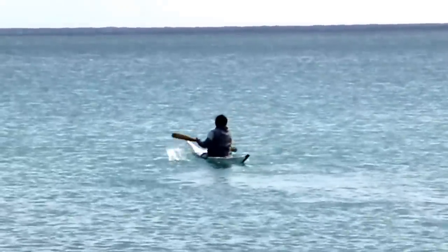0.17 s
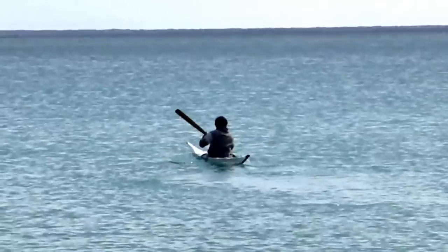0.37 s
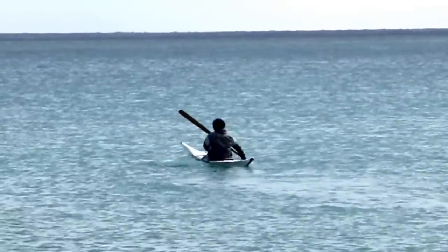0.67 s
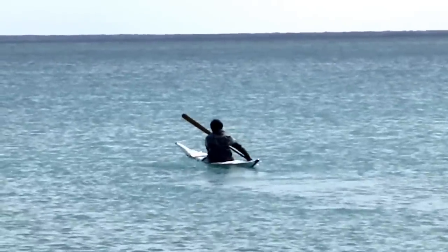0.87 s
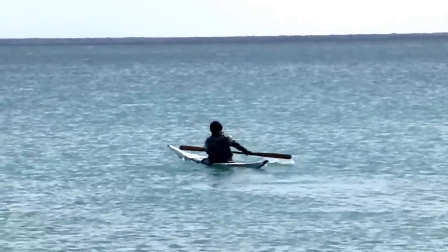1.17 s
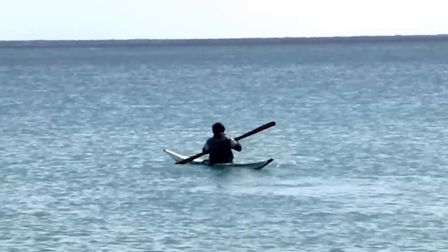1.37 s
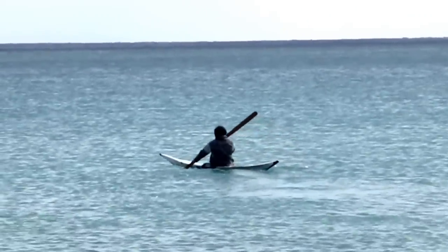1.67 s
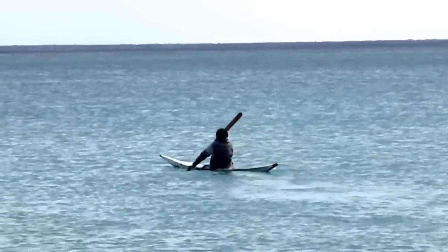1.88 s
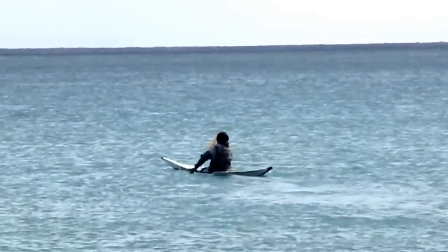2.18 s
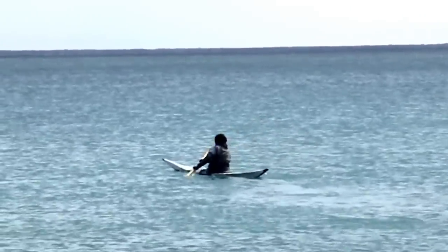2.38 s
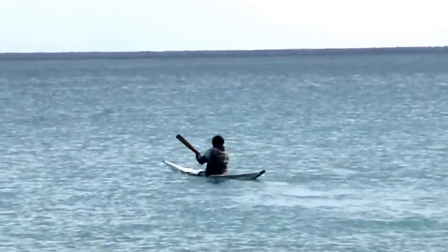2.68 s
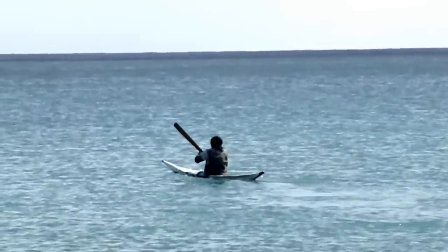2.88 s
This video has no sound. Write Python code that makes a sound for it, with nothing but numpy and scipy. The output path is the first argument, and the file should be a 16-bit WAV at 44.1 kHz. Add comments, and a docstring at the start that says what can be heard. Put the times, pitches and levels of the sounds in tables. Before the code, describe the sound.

A small wave washes ashore, close to a slightly nasal microphone. Quiet sea hiss and faint wind rumble open, with soft hollow knocks near 0.2 s and tiny drips and glugs to 0.6. At about 0.65 plops burst into a bubbly, fluttering splash, swelling around 1.0 and again at 1.65 with fizzing foam, knocks and crisp droplets. Last drips fall near 2.1; the hiss drains away by 3.

```python
"""A small wave on a shore

A wave washes in, swells and drains away: four ranges of hiss, each mixed with a cloud of ringing bubbles.
Knocks, plops and droplets stand out as damped rings with a splat of noise; glugs are gliding sines.
Shaped noise behind them is the distant sea, a faint wind rumble and microphone hiss.
The microphone's housing gives the wave, knocks, plops and droplets a nasal colour."""
import sys
import numpy as np
from scipy.fft import rfft, irfft, next_fast_len
from scipy.io import wavfile
from scipy.ndimage import map_coordinates

SR = 44100
rng = np.random.default_rng(int(sys.argv[2]) if len(sys.argv) > 2 else 0)


def unload_wav(signal):
    """Save mono or channel-first audio to the path in sys.argv[1] as 16-bit WAV at rate SR, clipped to [-1, 1]."""
    wavfile.write(
        sys.argv[1],
        SR,
        np.round(np.clip(np.atleast_2d(signal).T, -1, 1) * 32767).astype(np.int16),
    )


N = 132300  # samples, 3 s


def wave():
    """Four ranges of one wash; a fast surge moves the upper three together, deepest in full flow."""
    low = gurgle()
    upper = splash() + fizz() + foam()
    full_db, calm_db = 0.74, 0.6  # surge depth at the height of the flow and towards silence
    flow_db = curve(SPLASH_LEVEL)
    depth_db = calm_db + (full_db - calm_db) * amp(flow_db - flow_db.max())
    return low + amp(depth_db * wobble(110)) * upper


# middle range of the wash, rms before the surge: start_s, level_db
SPLASH_LEVEL = [(0, -47), (.14, -54.5), (.42, -41.5), (.57, -35), (.66, -26.5), (.8, -28.5), (1.06, -24.5),
                (1.42, -28.5), (1.66, -24), (1.9, -29.5), (2.15, -35), (2.63, -40), (3, -45.5)]
# tone of the middle range: freq_hz, gain_db (relative)
SPLASH_BAND = [(500, -29), (900, -11.5), (1250, -0.5), (2000, -2), (2900, -1), (4000, -5), (7000, -63)]


def splash():
    """Smaller bubbles ring higher and splash through the middle range."""
    grains = bubbles(1117, 3380, cycles=20.7, spread_db=1.5, count=3000, size=1200)
    return water(SPLASH_LEVEL, SPLASH_BAND, grains, hiss_db=8.0, flutter_db=-0.27, rate=28)


# splashing treble, rms before the surge: start_s, level_db
FIZZ_LEVEL = [(0, -59), (.3, -43), (.41, -47), (.52, -37), (.578, -38.5), (.588, -31), (.8, -32.5),
              (.95, -29), (1.3, -32.5), (1.68, -29), (1.87, -33.5), (2.2, -40.5), (3, -45.5)]
# tone of the treble: freq_hz, gain_db (relative)
FIZZ_TONE = [(1500, -44), (2600, 1), (3600, -3), (4400, -2), (5700, 5.5), (8000, -0.5), (10200, 1),
             (12000, -5), (16000, -57)]


def fizz():
    """Spray fizzes: tiny bubbles ring briefly over a wide treble range."""
    grains = bubbles(2880, 11650, cycles=24, spread_db=3.0, count=3500, size=600)
    return water(FIZZ_LEVEL, FIZZ_TONE, grains, hiss_db=6.0, flutter_db=0.2, rate=80)


# low range of the wash, rms before the trim in gurgle(): start_s, level_db
GURGLE_LEVEL = [(0, -60), (.44, -51), (.59, -50.5), (.66, -36.5), (1.15, -32.5), (1.42, -37.5),
                (1.58, -30.5), (2.05, -41.5), (2.6, -42.5), (3, -46.5)]
# tone of the low range: freq_hz, gain_db (relative)
GURGLE_TONE = [(150, -31), (330, -7.5), (550, -1), (850, 3), (1200, -8.5), (2000, -44.5)]


def gurgle():
    """Big bubbles ring low and gurgle."""
    grains = bubbles(376, 1000, cycles=15.0, spread_db=0.7, count=1500, size=2000)
    trim = amp(-1.7)
    return trim * water(GURGLE_LEVEL, GURGLE_TONE, grains, hiss_db=8.5, flutter_db=0.1, rate=14)


# foam sparkling behind each crest, rms before the surge: start_s, level_db
FOAM_LEVEL = [(.7, -57), (.86, -43), (.97, -30.5), (1.16, -29), (1.28, -35), (1.5, -32), (1.79, -31),
              (1.92, -35), (3, -56)]
# tone of the foam: freq_hz, gain_db (relative)
FOAM_TONE = [(2800, -24.5), (3900, 1.5), (4800, -0.5), (6200, -24)]


def foam():
    """Foam sparkles: bubbles of a narrow pitch range stand out above their hiss."""
    grains = bubbles(3510, 5120, cycles=30, spread_db=-1.0, count=2400, size=700)
    return water(FOAM_LEVEL, FOAM_TONE, grains, hiss_db=-2, flutter_db=-1.0, rate=16)


# nasal colour of the microphone's housing: freq_hz, gain_db
HOUSING_TONE = [(200, -17.5), (400, -11), (600, 2), (780, -1.5), (1020, -6.5), (1150, -4.5), (1290, 3.5),
                (1410, 4.5), (1560, -3), (2050, 1), (3400, -2), (4100, 4), (4550, 4.5), (5100, -0.5),
                (5800, -7), (6250, -14.5), (7350, -11.5), (7900, -8), (8700, -14), (10200, -14),
                (11300, -25.5), (15800, -36)]


def water(level, band, grains, hiss_db, flutter_db, rate):
    """Bubbles on a bed of hiss, in one range; the fuller the flow, the more they merge into the hiss."""
    merge = 0.27  # dB by which bubbles sink into the hiss for each dB the level grows
    level_db = curve(level)
    below_peak_db = np.minimum(level_db.max() - level_db, 14)
    share = amp(merge * below_peak_db - hiss_db)  # bubbles over hiss
    mix = (share * grains + rng.standard_normal(N)) / np.sqrt(1 + share ** 2)
    mix = mix * amp(flutter_db * wobble(rate))
    return amp(level_db) * unit(colour(mix, band, HOUSING_TONE))


def bubbles(lo_hz, hi_hz, cycles, spread_db, count, size):
    """A cloud of short rising rings; a positive spread makes most faint, a negative one most loud."""
    when, pitch, strength, life = rng.random((count, 4)).T[:, :, None]
    hz = lo_hz * (hi_hz / lo_hz) ** pitch
    turns = hz * np.arange(size) / SR
    age = np.minimum(turns / (cycles * (.5 + life)), 1)  # 1 when the ring has died
    gain = amp(-spread_db * np.log(np.maximum(strength, .025)))
    tone = np.sin(2 * np.pi * turns * (1 + .1 * age))
    rings = gain * tone * amp(-60 * age) * (age < 1)
    places = (when * N).astype(int) + np.arange(size)
    return unit(np.bincount(places.ravel(), rings.ravel())[:N])


def slops():
    """The knocks, plops, droplets and glugs near the microphone."""
    return knocks() + plops() + droplets() + glugs()


# hollow knocks of slopping water: start_s, peak_db, pitch_hz, t60_s
KNOCK_HITS = [(0.197, -29.5, 437, 0.037), (.207, -28, 514, 0.039), (.220, -25.5, 490, 0.022),
              (1.522, -27, 574, 0.043), (1.544, -25, 713, 0.095), (1.677, -22, 688, 0.039),
              (2.283, -31, 425, 0.08)]


def knocks():
    """Low, hollow rings with a softened attack."""
    return placed([(start_s, pocket(db, hz, t60, attack=0.0022, splat_db=-4.0))
                   for start_s, db, hz, t60 in KNOCK_HITS])


# plops of larger bubbles: start_s, peak_db, pitch_hz
PLOP_HITS = [(0.206, -27, 1285), (.333, -28.5, 1640), (0.663, -14, 1403), (0.681, -17, 1410),
             (.699, -14, 1550), (1.674, -11.5, 1277), (1.692, -18, 1305), (1.917, -18, 1310),
             (1.950, -22, 1330)]


def plops():
    """Larger bubbles ring in the middle range and die within 30 ms."""
    return placed([(start_s, pocket(db, hz, t60=0.03, attack=0.0015, splat_db=-3.5))
                   for start_s, db, hz in PLOP_HITS])


# single droplets: start_s, peak_db, pitch_hz
DROPLET_HITS = [(.252, -27.5, 2270), (0.31, -28, 3600), (0.329, -27, 3660), (.361, -32, 8600),
                (.430, -33, 8100), (.463, -22.5, 4300), (0.465, -23, 3620), (0.497, -22.5, 2150),
                (0.526, -27, 4950), (0.61, -19, 3580), (1.318, -13, 5800), (1.36, -21, 6900),
                (1.461, -12.5, 2900), (1.512, -15, 3800), (1.639, -14, 4180), (1.651, -13, 2600),
                (1.892, -17, 3240), (1.941, -15.5, 3430), (1.97, -18, 3940), (2.028, -17, 2800),
                (2.139, -18, 3920), (2.149, -13.5, 3690), (2.339, -29, 7750)]


def droplets():
    """Single droplets: a crisp attack, a strong splat and a short ring."""
    return placed([(start_s, pocket(db, hz, t60=0.018, attack=0.00031, splat_db=-1))
                   for start_s, db, hz in DROPLET_HITS])


def pocket(peak_db, hz, t60, attack, splat_db):
    """One air pocket: a brief splat of noise around its pitch and a damped, rising ring."""
    t = np.arange(SR // 10) / SR
    turns = hz * t * (1 + 0.067 * np.minimum(t / t60, 1))
    ring = np.sin(2 * np.pi * turns) * amp(-60 * t / t60)
    splat_tone = [(hz / 2, -8), (hz, 0), (hz * 6, -20)]
    noise = unit(colour(rng.standard_normal(len(t)), splat_tone))
    splat = amp(splat_db - 60 * t / 0.017) * noise  # 60 dB down in 17 ms
    onset = 1 - np.exp(-t / attack)
    sound = colour((ring + splat) * onset, HOUSING_TONE)
    return amp(peak_db) * sound / np.abs(sound).max()


# air rising ahead of the wave, pitch before its unsteadiness: start_s, peak_db, first_pitch_hz, last_pitch_hz
GLUG_NOTES = [(.493, -40, 619, 650), (.528, -34.5, 732, 777), (.613, -35, 578, 730)]


def glugs():
    """Large bubbles rise in turn, each with its own gliding note."""
    return placed([(start_s, glug(db, first_hz, last_hz))
                   for start_s, db, first_hz, last_hz in GLUG_NOTES])


def glug(peak_db, first_hz, last_hz):
    """A large bubble whose unsteady note swells, fades and rises in pitch as it nears the surface."""
    u = np.linspace(0, 1, int(.044 * SR))  # 44 ms long
    hz = first_hz + (last_hz - first_hz) * u + 70 * wobble(218)[:len(u)]
    return amp(peak_db) * np.sin(np.pi * u) * np.sin(2 * np.pi * np.cumsum(hz) / SR)


# tone of the steady background: freq_hz, gain_db (relative)
SEA_TONE = [(36, -1.5), (70, -8.5), (260, -13), (600, -9), (1100, -13.5), (1330, -0.5), (1600, -9.5),
            (3200, -18), (4400, -10), (6300, -22), (15800, -33)]


def sea():
    """Distant water, wind rumble and microphone hiss as one steady shaped noise."""
    level_db = -40.5  # rms
    return amp(level_db) * unit(colour(rng.standard_normal(N), SEA_TONE))


def amp(db):
    """Decibels to gain."""
    return 10 ** (np.asarray(db) / 20)


def unit(x):
    """Scale to rms 1."""
    return x / np.sqrt(np.mean(x ** 2) + 1e-20)


def curve(rows):
    """Straight lines between the (time, value) rows, one value per sample."""
    return np.interp(np.arange(N) / SR, *np.transpose(rows))


def wobble(rate):
    """A smooth random curve, rate knots a second."""
    return map_coordinates(rng.standard_normal(2000), [np.arange(N) * rate / SR], mode="wrap")


def placed(sounds):
    """Lay (start_s, sound) pairs on one track."""
    out = np.zeros(N + SR)
    for start_s, sound in sounds:
        out[round(start_s * SR):][:len(sound)] += sound
    return out[:N]


def colour(x, *spectra):
    """Causal minimum-phase filter whose gain in dB is the sum of the (Hz, dB) tables."""
    m = 2 * next_fast_len(len(x))
    log_hz = np.log(np.fft.rfftfreq(m, 1 / SR) + 1)
    db = 0
    for table in spectra:
        hz, gain_db = np.transpose(table)
        db = db + np.interp(log_hz, np.log(hz), gain_db)
    # folding the cepstrum forward in time keeps the filter from sounding early
    cepstrum = irfft(np.log(amp(db)))
    cepstrum[1:m // 2] *= 2
    cepstrum[m // 2 + 1:] = 0
    return irfft(rfft(x, m) * np.exp(rfft(cepstrum)))[:len(x)]


def scene():
    """The wave and its slops over the distant sea."""
    return (wave() + slops() + sea())[None]


def record(dry):
    """Nothing is kept above the band limit."""
    top_hz = 15750
    m = next_fast_len(N + SR // 2)
    kept = np.fft.rfftfreq(m, 1 / SR) < top_hz
    return irfft(rfft(dry, m) * kept, m)[..., :N]


dry = scene()
out = record(dry)
unload_wav(out)
```